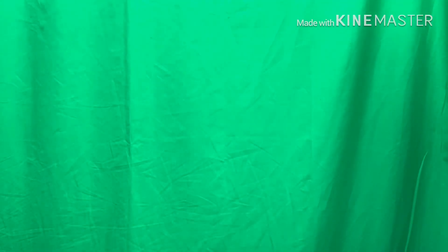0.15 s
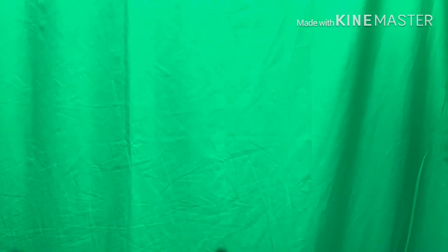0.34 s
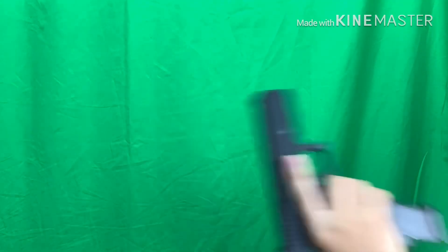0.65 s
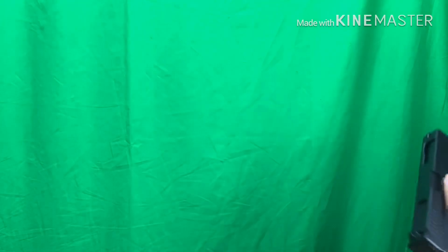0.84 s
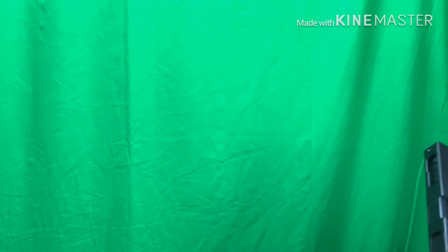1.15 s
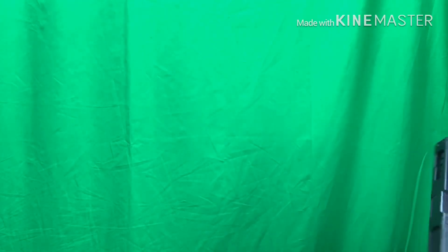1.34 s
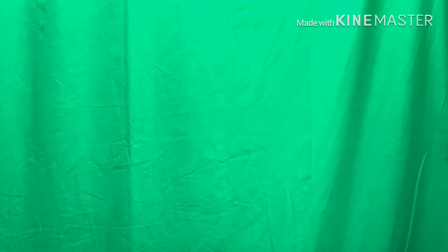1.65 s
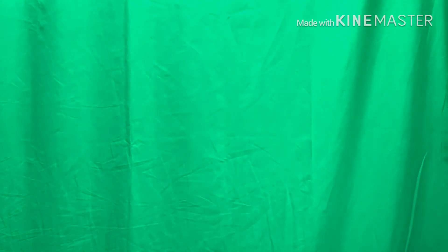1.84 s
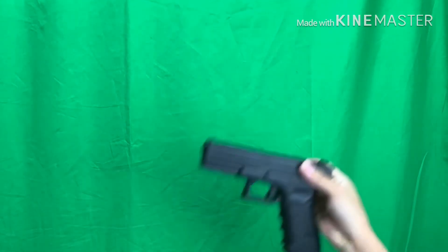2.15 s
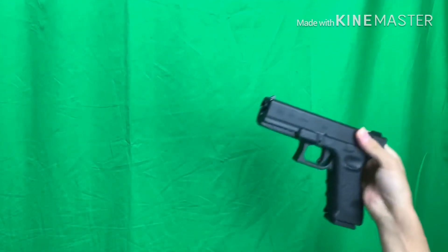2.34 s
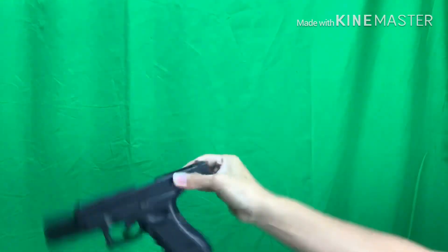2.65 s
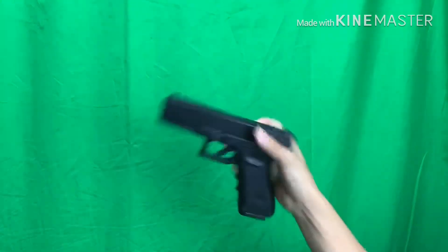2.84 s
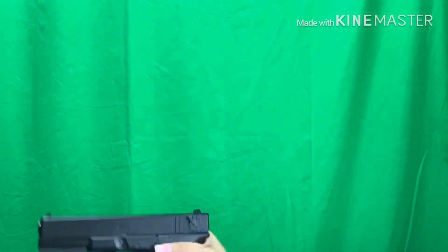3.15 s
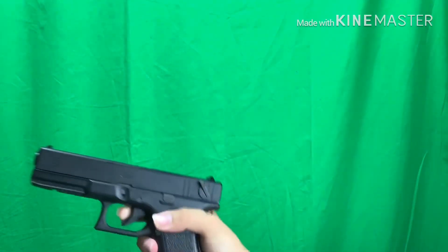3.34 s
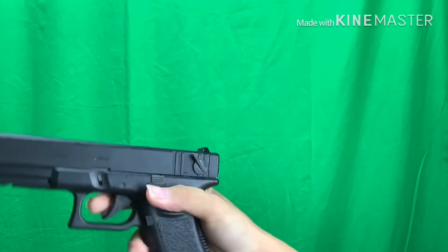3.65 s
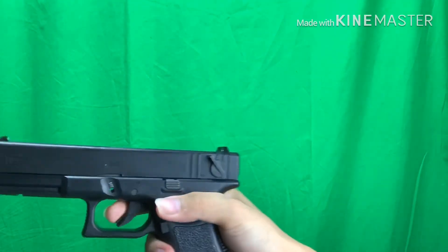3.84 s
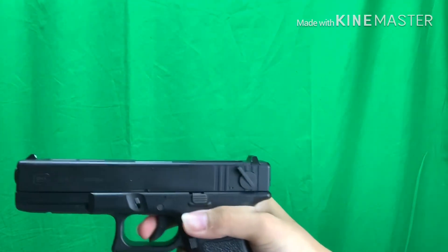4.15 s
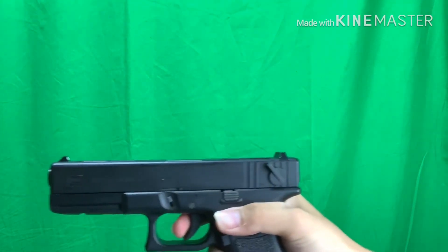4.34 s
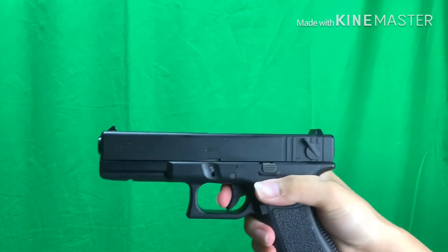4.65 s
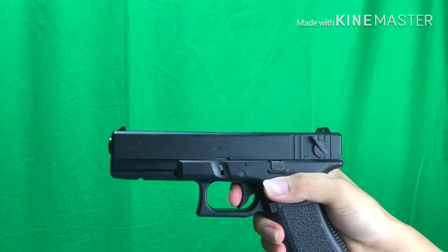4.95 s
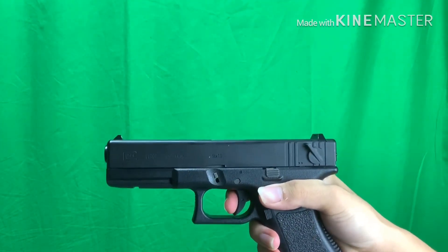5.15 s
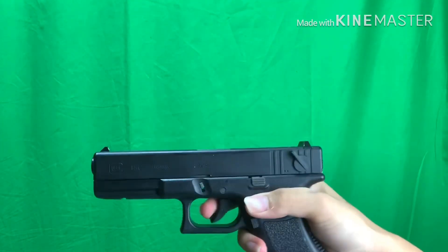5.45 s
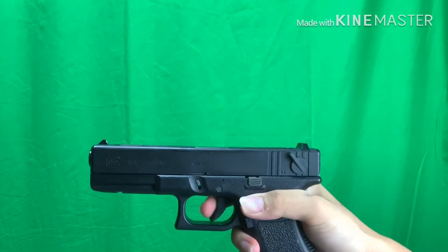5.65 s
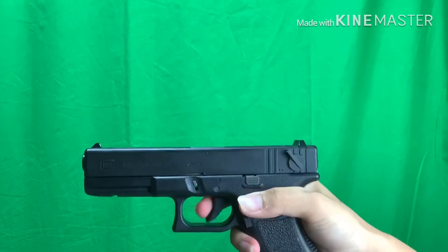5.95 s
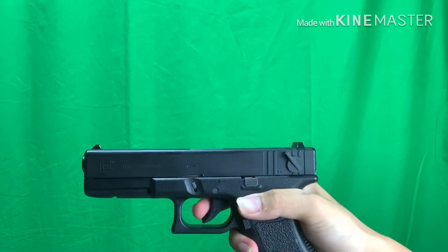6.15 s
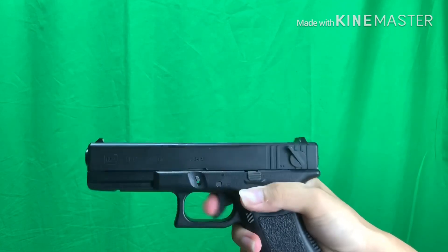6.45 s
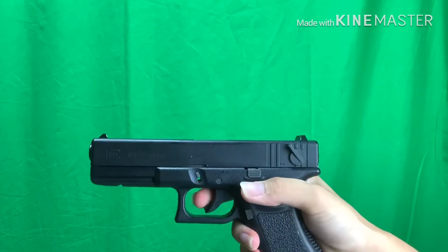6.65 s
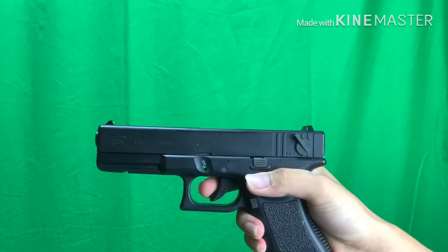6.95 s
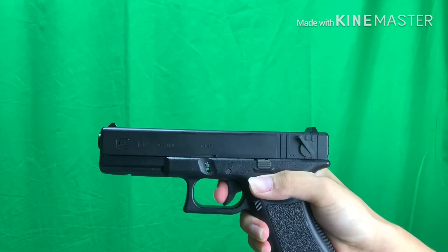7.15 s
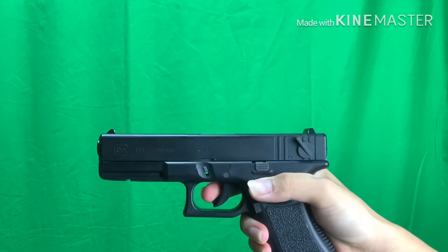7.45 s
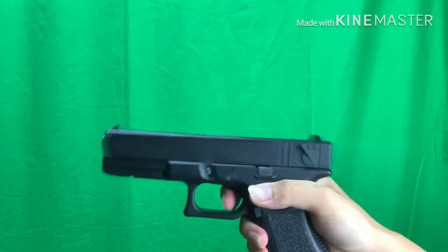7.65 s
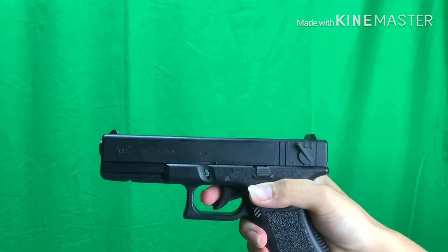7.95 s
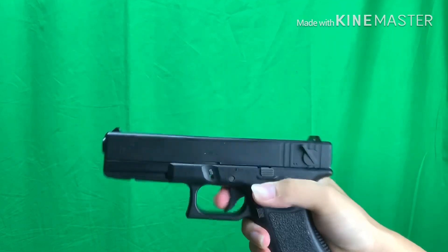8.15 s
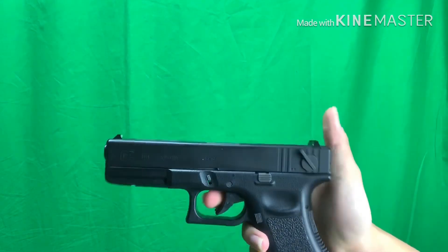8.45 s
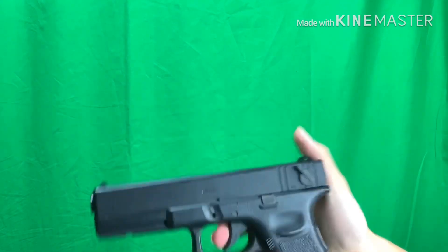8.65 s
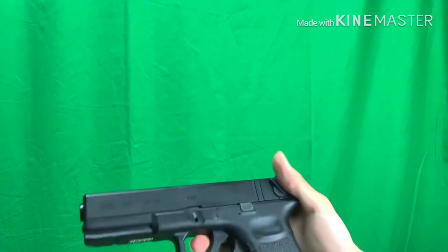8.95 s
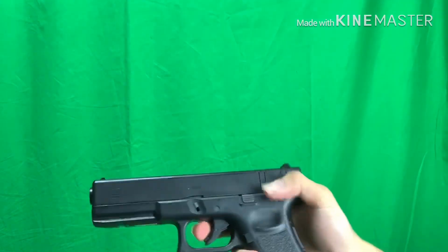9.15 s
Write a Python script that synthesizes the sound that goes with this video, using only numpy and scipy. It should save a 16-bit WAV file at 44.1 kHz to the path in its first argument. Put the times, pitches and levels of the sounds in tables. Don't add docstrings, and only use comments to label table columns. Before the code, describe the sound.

Hand rustle and light taps lead to a sharp metallic magazine click. The slide is pulled back and snapped forward, clattering harshly with short room reverberation. Quiet skin rubs and tiny squeaks follow. Then six loud, dry airy cracks come irregularly, with gas bursts, rattling plastic and steel, low air thumps on the microphone, and small trigger clicks between. It settles into faint handling over low room tone.

```python
import sys
import numpy as np
from scipy import signal
from scipy.fft import rfft, irfft, next_fast_len
from scipy.io import wavfile
from scipy.ndimage import uniform_filter1d, map_coordinates

SR = 44100
rng = np.random.default_rng(int(sys.argv[2]) if len(sys.argv) > 2 else 0)


def dump(signal):
    limited = np.clip(np.atleast_2d(signal).T, -1, 1)
    pcm = np.round(limited * 32767).astype(np.int16)
    wavfile.write(sys.argv[1], SR, pcm)


def magnitude_from_level(level_db):
    exponent = np.asarray(level_db, float) / 20
    return 10 ** exponent


N = 409688
T = np.arange(N) / SR


def unit(x):
    return x / np.sqrt(np.mean(x ** 2) + 1e-20)


def along(points, hz):
    f, v = np.transpose(points)
    return np.interp(np.log(hz + 1), np.log(f + 1), v)


def filtered(x, response):
    m = next_fast_len(x.shape[-1] + 2048)
    spectrum = rfft(x, m) * response(np.fft.rfftfreq(m, 1 / SR))
    return irfft(spectrum, m)[..., :x.shape[-1]]


def modes(table):
    def response(f):
        return sum((-1) ** k * magnitude_from_level(db) * 1j * f * width / (hz * hz - f * f + 1j * f * width)
                   for k, (hz, width, db) in enumerate(table))
    return response


def rush(response, alike, grain_db):
    def mid_side(hz):
        turn = np.arccos(np.clip(along(alike, hz), -1, 1)) / 2
        return response(hz) * [np.cos(turn), np.sin(turn)]

    mid, side = filtered(rng.standard_normal((2, N)), mid_side)
    flutter = map_coordinates(rng.standard_normal(N // 160 + 4), [np.arange(N) / 160])
    return unit(magnitude_from_level(grain_db * flutter) * np.array([mid + side, mid - side]))


def patchy(x, db):
    z = signal.stft(x, nperseg=256)[2]
    field = rng.standard_normal(z.shape[1:])
    for axis in (0, 1):
        field = uniform_filter1d(field, size=4, axis=axis)
    return unit(signal.istft(z * magnitude_from_level(db * unit(field)), nperseg=256)[1][:, :N])


def spans(rows):
    gains = np.zeros((2, N))
    for times, levels_db, low_db in rows:
        on = slice(round(times[0] * SR), round(times[-1] * SR))
        fade = np.clip(np.minimum(T[on] - times[0], times[-1] - T[on]) / 0.0058, 0, 1)
        gains[:, on] += fade * magnitude_from_level(np.interp(T[on], times, levels_db) + [[0], [low_db]])
    return gains


# (frequency [Hz], t60 [s])
ROOM_T60 = [(200, .36), (500, .3), (1400, .27), (4000, .25), (10000, .23), (12500, .21), (15500, .2)]
# (frequency [Hz], level [dB])
WALL_COLOUR = [(200, -6), (1000, -1), (4000, -0.5), (8300, 1), (15000, -5.5)]


def walls():
    buildup_s = .008
    hz, t, z = signal.stft(rng.standard_normal((2, SR // 3)), SR, nperseg=256)
    colour_db = along(WALL_COLOUR, hz) + 0.77 * rng.standard_normal(len(hz))
    decay_db = 60 * t / along(ROOM_T60, hz)[:, None]
    z = z * magnitude_from_level(colour_db[:, None] - decay_db) * (1 - np.exp(-(t / buildup_s) ** 2))
    z[1] += np.clip(1 - hz / 1000, 0, 1)[:, None] * (z[0] - z[1])
    tail = signal.istft(z, SR, nperseg=256)[1]
    return tail / np.linalg.norm(tail[0])


def room(x, tail=None):
    return signal.oaconvolve(x[None], walls() if tail is None else tail, axes=1)


# (frequency [Hz], t60 [s])
LATE_T60 = [(200, 0.31), (1000, 0.5), (4000, 0.33), (9000, 0.32), (15000, 0.24)]


def late(x):
    hz, t, z = signal.stft(rng.standard_normal((2, SR // 2)), SR, nperseg=256)
    decay = magnitude_from_level(-60 * t / along(LATE_T60, hz)[:, None])
    z = z * decay * (1 - np.exp(-t / 0.016)) * (hz[:, None] > 150)
    tail = signal.istft(z, SR, nperseg=256)[1]
    return signal.fftconvolve(x.mean(0)[None], tail / np.linalg.norm(tail[0]), axes=1)[:, :N]


# (frequency [Hz], density [dB per Hz])
HUM_SPECTRUM = [(12, -36.5), (20, -2), (86, -5), (607, -30), (802, -31.5), (1660, -37.5), (2670, -41.5),
                (14300, -47), (16000, -57.5)]
# (time [s], level [dB])
HUM_LEVEL = [(0, -76), (2.6, -76), (3.1, -72), (3.5, -76.5), (5.303, -76.5), (6.1, -76.5), (7.2, -82),
             (7.6, -68), (8.299, -81.5), (8.6, -88.5), (9.29, -92.5)]
# (frequency [Hz], left-right likeness [-1 to 1])
HUM_COHERENCE = [(60, 1), (380, 0.62), (2380, 0.81), (15000, -0.04)]


def room_tone():
    s, db = np.transpose(HUM_LEVEL)
    return magnitude_from_level(np.interp(T, s, db) + 10.5) * rush(lambda f: magnitude_from_level(along(HUM_SPECTRUM, f)), HUM_COHERENCE, -2.0)


# (loudest [s], rustle [dB], swells [s], fades [s], low part [dB])
RUBS = [(0.547, -51.5, 0.092, 0.068, -11), (0.871, -43.5, 0.067, 0.043, -3.5),
        (.915, -45, .012, 0.16, -9.5), (1.504, -72.5, 0.11, 0.27, -19.5), (1.775, -60.5, 0.12, 0.18, -4),
        (1.92, -71, .04, 0.16, -14), (2.04, -66, 0.27, 0.14, -35), (2.105, -65.5, 0.08, 0.1, 10.5),
        (2.374, -74, 0.038, 0.091, 2), (2.624, -54.5, 0.013, 0.11, 12), (4.26, -77.5, 0.6, 0.23, -25),
        (4.47, -72, 0.19, 0.19, -22), (4.542, -59, 0.069, 0.1, -7), (5.68, -59, 0.069, 0.083, 8),
        (5.818, -66.5, .012, .09, 14.5), (6.2, -59.5, 0.064, 0.14, 7.5), (6.746, -49, 0.043, 0.11, -1.5),
        (6.958, -72, 0.017, 0.15, 10.5), (8.051, -59, 0.037, 0.087, -1.5),
        (9.274, -67.5, 0.057, 0.033, -5.5)]
# (frequency [Hz], density [dB per Hz])
CLOTH_SPECTRUM = [(900, -26), (2000, -16), (4500, -11.5), (7600, -8), (8300, 0), (10500, -8.5),
                  (14800, -15.5), (16000, -27.5)]
# (frequency [Hz], width [Hz], level [dB])
PALM_MODES = [(450, 400, -8), (1000, 430, -4), (1500, 320, 1.5), (2400, 660, -5.5), (3600, 590, -2.5)]
# (frequency [Hz], left-right likeness [-1 to 1])
NEAR_COHERENCE = [(200, 0.78), (640, 0.94), (1400, 0.11), (3000, 0.6), (12000, 1)]


def rustle():
    depth_db = 26
    bright, low = spans(([s - swells_s, s, s + fades_s], [db - depth_db, db, db - depth_db], low_db)
                        for s, db, swells_s, fades_s, low_db in RUBS)
    soft = bright * rush(lambda f: magnitude_from_level(along(CLOTH_SPECTRUM, f)), NEAR_COHERENCE, grain_db=2.5)
    return magnitude_from_level(-1.5) * soft + magnitude_from_level(-3) * low * rush(modes(PALM_MODES), NEAR_COHERENCE, grain_db=3)


# (time [s], level [dB], pitch [Hz], half length [ms])
SLIPS = [
    (3.908, -70, 1700, 8),
    (3.924, -70, 1680, 5),
    (5.128, -68, 1620, 9),
    (4.85, -66, 1600, 8),
]


def squeaks():
    out, t = np.zeros(N), np.arange(-SR // 20, SR // 20) / SR
    for s, db, hz, ms in SLIPS:
        bell = np.exp(-(t / (ms / 1000)) ** 2)
        note = np.sin(2 * np.pi * hz * t + 2 * np.sin(500 * t))
        out[round((s + t[0]) * SR):][:len(t)] += magnitude_from_level(db) * bell * note
    return out + magnitude_from_level(-2.0) * room(out)[:, :N]


# (time [s], signed peak [1], swing [Hz])
AIR_SURGES = [(2.87, .012, 14), (5.411, .24, 90), (5.431, -.17, 60), (5.443, .12, 30), (6.481, .17, 66),
              (6.516, -.07, 32), (7.3695, .36, 38), (7.745, -.1, 80), (7.76, .36, 30), (7.7592, -.2, 110),
              (8.21, -.12, 70), (8.226, .4, 31), (8.2245, -.22, 110)]
# (time [s], peak [dB], t60 [s], stilled at [s])
STAND_SHIVERS = [(2.85, -40, .4, 3.3), (5.46, -33, .3, 5.6), (5.593, -31, .9, 5.93), (6.54, -33, .2, 6.62),
                 (6.585, -38, 1.4, 6.82), (7.39, -40, .7, 7.6), (7.56, -44, .6, 7.75),
                 (7.79, -37, .4, 7.88), (7.85, -39, 1.4, 7.99), (7.945, -46, .3, 8.05),
                 (8.25, -36, .25, 8.37), (8.352, -42, .7, 8.68)]


def pushes():
    bell_cycles, stand_hz, jolt_s = 0.3, 43.7, 0.0011
    out, t, life = np.zeros(N + SR), np.arange(-SR // 10, SR // 10) / SR, np.arange(SR // 2) / SR
    for s, peak, hz in AIR_SURGES:
        bell = np.exp(-.5 * (hz * t / bell_cycles) ** 2)
        out[round((s + t[0]) * SR):][:len(t)] += peak * np.cos(2 * np.pi * hz * t) * bell
    for s, db, t60, end in STAND_SHIVERS:
        out[round((s + t[0]) * SR):][:len(t)] -= magnitude_from_level(db) * np.exp(-.5 * (t / jolt_s) ** 2)
        ring = magnitude_from_level(db - 60 * life / t60) * np.sin(2 * np.pi * stand_hz * life)
        out[round(s * SR):][:len(life)] += ring * np.clip((end - s - life) / .09, 0, 1)
    b, a = signal.butter(2, 3, "high", fs=SR)
    out = signal.lfilter(b, a, out[:N])
    return np.array([np.roll(out, 12), out])


# (end [s], level [dB], length [ms])
SHOT_SWELLS = [
    (5.401, -12, 27.7),
    (5.905, -35.5, 26),
    (5.915, -15, 15),
    (6.47, -20, 27.2),
    (7.35, -15.5, 27),
    (7.736, -13.5, 23),
    (8.201, -13, 22.4),
]


def swells():
    rise = np.zeros(N)
    for s, db, ms in SHOT_SWELLS:
        on = slice(round((s - ms / 1000) * SR), round(s * SR))
        rise[on] = magnitude_from_level(db - 32 * (s - T[on]) / (ms / 1000))
    bands_db = np.minimum(9 * rng.standard_normal(40), 2)

    def response(f):
        edges = np.clip((f - 100) / 200, 0, 1) * np.clip((8800 - f) / 400, 0, 1)
        return edges * (1 + 600 / (f + 100)) * magnitude_from_level(bands_db[np.minimum(f // 330, 39).astype(int)])

    return rise * rush(response, NEAR_COHERENCE, grain_db=.7)


# (loudest [s], hiss [dB], lasts [s], fades by [dB], low part [dB])
GAS_STROKES = [(2.722, -19.5, 0.11, -2, -25.5), (2.931, -14, 0.019, 0, -25.5),
               (5.408, -18.5, .095, 0.5, -4), (5.928, -20.5, 0.027, -4.5, -4.5),
               (5.95, -13, 0.021, 0, -1.5), (5.982, -18, 0.05, 9.5, -2), (6.478, -19.5, 0.017, -9.5, 0.5),
               (6.501, -14.5, 0.061, 9.5, -3.5), (7.366, -17, .014, 1, -7),
               (7.382, -13.5, 0.053, 11.5, -4.5), (7.748, -15, 0.025, 0.5, -5),
               (7.778, -19, 0.043, 11.5, -3.5), (8.21, -16.5, 0.038, 0, -9), (8.251, -22.5, 0.023, 8, -15)]
# (frequency [Hz], density [dB per Hz])
JET_SPECTRUM = [(880, -34), (1500, -10), (5070, -10.5), (7690, -12), (8490, -9.5), (11200, -12.5),
                (12400, -13.5), (14900, -14.5), (16000, -29)]
# (frequency [Hz], width [Hz], level [dB])
GRIP_MODES = [(240, 57, -2.5), (427, 110, 6.5), (720, 460, -2.5)]
# (frequency [Hz], width [Hz], level [dB])
SLIDE_MODES = [(1500, 90, 0.5), (2070, 2000, -11.5), (2480, 330, -0.5), (3600, 1500, -4.5)]


def strokes():
    rise_s, rise_db = 0.0064, 22.5
    bright, low = spans(([s - rise_s, s, s + lasts], [db - rise_db, db, db - fades_db], low_db)
                        for s, db, lasts, fades_db, low_db in GAS_STROKES)
    jet = rush(lambda f: magnitude_from_level(along(JET_SPECTRUM, f)), NEAR_COHERENCE, grain_db=3)
    hiss = magnitude_from_level(-6) * bright * patchy(jet, 4)
    shaken = rush(modes(GRIP_MODES + SLIDE_MODES[:2]), NEAR_COHERENCE, grain_db=5.5)
    dry = hiss + magnitude_from_level(-9.0) * low * shaken
    return dry + magnitude_from_level(-1.5) * room(dry.mean(0))[:, :N]


# (time [s], level [dB], [(frequency [Hz], width [Hz], level [dB])])
MAGAZINE_NOTES = [
    (0.898, -19.5, [(942, 96, -9.5), (2470, 50, -9), (3620, 44, -2.5), (4180, 39, 5), (6020, 80, -7.5), (7960, 41, -1.5), (8460, 120, -6), (9640, 27, -6.5)]),
    (1.055, -15.5, [(1470, 160, -9.5), (2450, 23, -9), (3830, 30, -9), (4500, 52, -8.5), (5540, 53, 2), (8340, 74, -3.5), (8900, 150, 0), (12100, 67, -1), (13900, 43, -15.5), (15000, 64, -10), (15200, 69, -14)]),
]


def magazine():
    damping = 4
    out = np.zeros((2, N + SR))
    for s, db, notes in MAGAZINE_NOTES:
        impulse = 1. * (np.arange(SR // 20) == 0)
        ring = filtered(impulse, modes([(hz, damping * width, g) for hz, width, g in notes]))
        wet = room(magnitude_from_level(db) * 4 * ring / np.linalg.norm(ring))
        out[:, round(s * SR):round(s * SR) + wet.shape[1]] += wet
    return out[:, :N]


# (hammer [s], hammer [dB], hammer pitch [Hz], falling note [dB], pop [dB])
VALVE_SHOTS = [
    (5.396, -3, 3070, -16.5, -18),
    (5.418, -12, 3000, -13, -41),
    (5.9128, -2.5, 4124, -36.5, -10.5),
    (6.4669, -4, 4295, -17, -14.5),
    (7.346, -3.5, 4500, -14, -13),
    (7.7305, -11.5, 4780, -13, -13),
    (8.199, -6.5, 3830, -10.5, -14),
]
CHAMBER_OPENS = [5.3982, 5.419, 5.9135, 6.4678, 7.3473, 7.7336, 8.199]
NOZZLE_POPS = [5.4113, 5.4319, 5.9262, 6.4807, 7.3597, 7.7468, 8.2121]
# (time [s], level [dB])
SLIDE_STOPS = [
    (5.452, -21),
    (5.969, -25),
    (6.523, -14),
    (7.4015, -16),
    (7.789, -17),
    (8.2555, -24),
    (8.26, -21),
]


def chamber():
    def note(hz):
        return np.sin(2 * np.pi * np.cumsum(hz) / SR)

    out, t = np.zeros(N), np.arange(SR // 20) / SR
    fall = note(110 + 2800 * np.exp(-t / .0017))
    fall = fall * (t / .0033) ** 2.2 * np.exp(2.2 - 2.2 * t / .0033)
    pop = -note(1500 - 1150 * np.exp(-t / .003))
    pop = pop * (np.exp(-(t / .002) ** 2) + .3 * np.exp(-(t / .016) ** 2))
    for fall_s, pop_s, (*_, fall_db, pop_db) in zip(CHAMBER_OPENS, NOZZLE_POPS, VALVE_SHOTS):
        out[round(fall_s * SR):][:len(t)] += magnitude_from_level(fall_db) * fall
        out[round(pop_s * SR):][:len(t)] += magnitude_from_level(pop_db) * pop
    stop = note(1730 + 543 * np.exp(-t / .004)) * np.exp(-t / 0.002) * (1 - np.exp(-t / 0.00083))
    for s, db in SLIDE_STOPS:
        out[round(s * SR):][:len(t)] += magnitude_from_level(db) * stop
    hollow = filtered(out, modes([(400, 58, 1), (1480, 54, -8.5)]))
    return np.array([np.roll(out, 6), out]) + room(magnitude_from_level(-10.5) * out + magnitude_from_level(-5.0) * hollow)[:, :N]


# (time [s], peak [dB], pitch [Hz])
SLIDE_BLOWBACK = [(5.442, -6, 5030), (5.45, -6, 2522), (5.9346, -6.5, 1450), (5.953, -11.5, 3670),
                  (5.962, -8, 5200), (5.985, -9, 1980), (6.488, -18, 3800), (6.505, -8, 1730),
                  (6.515, -7, 4750), (6.5232, -13, 1445), (7.3671, -8.5, 5200), (7.382, -13.5, 4970),
                  (7.4029, -4, 1960), (7.7261, -10, 1231), (7.756, -7.5, 3813), (7.789, -4.5, 1920),
                  (7.793, -11.5, 5530), (7.831, -16.5, 8500), (8.2212, -7, 1470), (8.2553, -3, 2000),
                  (8.259, -15.5, 1914)]
# (time [s], peak [dB])
SLIDE_RETURNS = [
    (5.5283, -8.5),
    (6.05, -10),
    (6.5897, -12.5),
    (7.498, -14.5),
]
# (time [s], steel [dB], plastic over steel [dB], plastic pitch [Hz])
RACKING_HITS = [(0.8901, -20.5, 3, 4640), (.891, -48, 17, 960), (0.898, -43.5, 12, 1297),
                (.912, -30.5, -3.5, 3500), (.918, -32.5, -6, 4133), (1, -48.5, 9, 3480),
                (1.0339, -26, 11.5, 8900), (1.036, -30, -12.5, 4500), (1.0552, -8.5, -11.5, 3850),
                (1.0559, -32, 15, 6490), (1.0546, -32, 15.5, 10180), (1.063, -25.5, -11.5, 5000),
                (1.069, -18, -14.5, 5480), (1.0722, -22, -13, 5490), (1.0551, -23, 14.5, 13060),
                (1.054, -50, 8, 1000), (2.6264, -37.5, -6.5, 2500), (2.699, -34, 6.5, 1722),
                (2.7061, -37.5, -6, 8000), (2.711, -29, -3, 6517), (2.716, -21, 3, 6410),
                (2.7252, -5.5, -13.5, 1000), (2.7437, -15, -11, 4195), (2.747, -7.5, -18.5, 5200),
                (2.7684, -10, -5, 3275), (2.7562, -10.5, -5.5, 1700), (2.7728, -2.5, -8, 4952),
                (2.914, -25.5, 5.5, 2207), (2.9222, -12, -7, 2086), (2.934, -21.5, -1.5, 4882),
                (2.939, -6, -1.5, 6310), (2.943, -7, -7, 2613), (2.9483, -4.5, -7, 1898),
                (3.051, -36.5, 12, 2600), (3.1014, -23.5, -1, 5230), (3.1362, -45, 12, 2400),
                (3.1724, -47.5, -9, 1570), (3.211, -54, 13.5, 1850), (3.2231, -40, -13, 1940),
                (3.3283, -69.5, 16, 1880), (3.4171, -61, 14, 4800), (3.438, -48, -2, 2018)]
# (time [s], steel [dB], plastic over steel [dB], plastic pitch [Hz])
HANDLING_TAPS = [(0.5563, -60, 14, 1840), (0.7896, -56, -19.5, 5840), (0.859, -27.5, 0, 3300),
                 (.8613, -36.5, 4, 1760), (0.864, -31, -5, 1190), (0.868, -42, 6.5, 1297),
                 (1.7665, -52, 3, 3500), (1.773, -50.5, 4, 4500), (1.896, -55, 11, 2640),
                 (2.052, -48, -10, 5000), (2.119, -54, 8, 5500), (1.891, -46, 1.5, 2130),
                 (1.899, -61, 9, 1330), (2.0722, -54, 14.5, 1800), (2.094, -42, -2, 2070),
                 (2.109, -62, 6.5, 1450), (2.161, -70, 13, 1480), (3.682, -75, 11, 1420),
                 (4.534, -50, -5, 1180), (4.584, -57, 7.5, 4520), (8.6914, -49, 4, 1320),
                 (8.7844, -78.5, 21, 1904), (8.844, -78.5, 19, 1924), (8.873, -55, -3, 3780),
                 (8.9136, -72.5, 23, 1570), (9.073, -70, 15.5, 1227), (9.107, -77, 18.5, 1830),
                 (9.179, -71.5, 9, 1990), (9.225, -74.5, 17.5, 1950), (9.269, -64, 18, 12800),
                 (9.268, -40, -13, 2100)]
# (time [s], steel [dB], plastic over steel [dB], plastic pitch [Hz])
TRIGGER_CLICKS = [(5.8083, -54.5, -1.5, 1500), (5.826, -52, 5, 4030), (6.1931, -38, 1, 3770),
                  (6.3509, -44.5, -6.5, 1706), (6.735, -34.5, -5, 3600), (7.283, -48, -8, 1625),
                  (7.6967, -41, -6.5, 4240), (8.043, -45, -3, 3090), (8.1686, -40, -8.5, 1830)]
# (time [s], steel [dB], plastic over steel [dB], plastic pitch [Hz])
CLOSE_SNAPS = [(0.5525, -56, 13, 4400), (.5525, -56, 15, 2900), (0.5528, -56, 19, 1100),
               (0.8988, -19, 7, 3700), (2.6275, -38, 8, 4600), (2.6245, -50, 14, 1300),
               (2.887, -50, 16, 1400), (4.8426, -70, 18, 1600), (4.843, -76, 14, 3500)]


def contacts():
    # (plastic over steel [dB], grip knock over plastic [dB], room [dB])
    hammer, slide_back, slide_home = (-6, -11.5, -6), (-7, -18, -10), (-16.5, -12.5, -7.5)
    return_hz = 1420
    hits = [(s, db, hz, *hammer) for s, db, hz, *_ in VALVE_SHOTS]
    hits += [(*row, *slide_back) for row in SLIDE_BLOWBACK]
    hits += [(*row, return_hz, *slide_home) for row in SLIDE_RETURNS]
    for table, knock_db, room_db in ((RACKING_HITS, -35, -8.5), (HANDLING_TAPS, -20, -4),
                                     (TRIGGER_CLICKS, -20, -4), (CLOSE_SNAPS, -35, -11)):
        hits += [(s, db, hz, plastic_db, knock_db, room_db) for s, db, plastic_db, hz in table]
    return [(s, db, plastic_db + knock_db, plastic_db, hz, room_db)
            for s, db, hz, plastic_db, knock_db, room_db in hits]


# (frequency [Hz], width [Hz], level [dB])
STEEL_MODES = [(5200, 10000, 5), (7260, 5100, 3), (8170, 440, 5), (10270, 600, 7), (12200, 630, 1),
               (16200, 2900, -2.5)]
BLOW_RISE = [0.0027, 0.0017, 0.0014]


def clacks():
    scatter_db, edge = 2.5, 2.5
    out, t = np.zeros((2, N + SR)), np.arange(SR // 40) / SR
    impulse = 1. * (t == 0)
    u = t / np.reshape(BLOW_RISE, (-1, 1, 1))
    port_share = np.array([[.9], [.7], [.55]])
    grip = modes(GRIP_MODES)
    tails = [walls() for _ in range(23)]
    for n, (s, db, knock_db, plastic_db, hz, room_db) in enumerate(contacts()):
        def slide(width):
            ring = modes([(hz, width * hz, 0)] + [(c, w, g - 12) for c, w, g in SLIDE_MODES])
            return lambda f: ring(f) / (1 + 1j * f / (1.7 * hz)) ** 2

        scatter = scatter_db * rng.standard_normal(len(STEEL_MODES))
        bits = modes([(c, w, g + r) for (c, w, g), r in zip(STEEL_MODES, scatter)])

        def steel(f):
            return bits(f) * (1j * f / (1j * f + 3500)) ** 2

        burst = rng.standard_normal((3, 2, len(t)))
        burst[:, 1] += port_share * (burst[:, 0] - burst[:, 1])
        burst *= (u * np.exp(1 - u)) ** 2
        burst[1:, :, round(.001 * SR)] += edge
        parts = np.array([filtered(b, body) for b, body in zip(burst, (grip, slide(0.1), steel))])
        gains = magnitude_from_level([db + knock_db, db + plastic_db, db + 3.5])[:, None, None]
        parts *= gains / np.abs(parts).max(2, keepdims=True)

        even = np.array([filtered(impulse, body) for body in (grip, slide(0.34), steel)])
        strength = np.linalg.norm(parts[:, 0], axis=1, keepdims=True)
        even *= strength / np.linalg.norm(even, axis=1, keepdims=True)
        wet = magnitude_from_level(room_db) * room(even.sum(0), tails[n % len(tails)])
        at = round((s - .0008) * SR)
        out[0, at + 6:][:len(t)] += parts[:, 0].sum(0)
        out[1, at:][:len(t)] += parts[:, 1].sum(0)
        out[:, at:at + wet.shape[1]] += wet
    return out[:, :N]


def scene():
    pistol = clacks() + magazine() + squeaks() + chamber() + swells() + strokes() + rustle()
    return pistol + magnitude_from_level(-22) * late(pistol) + pushes() + room_tone()


def band_limit(x):
    return signal.sosfilt(signal.butter(12, 16650, fs=SR, output="sos"), x)


# (frequency [Hz], level [dB])
PORT_BALANCE = [(500, 0), (2000, -1), (5000, -0.5), (8500, 8), (12000, 0)]
# (frequency [Hz], width [Hz], depth [0-1])
TOP_GAPS = [(11300, 520, .95), (13480, 520, .97), (16500, 2400, .95)]


def record(dry):
    def gaps(f):
        return np.prod([1 - np.clip(depth, 0, 1) * np.exp(-((f - hz) / (width / 2)) ** 4)
                        for hz, width, depth in TOP_GAPS], axis=0)

    x = filtered(dry, lambda f: magnitude_from_level(along(PORT_BALANCE, f) * [[.5], [-.5]]))
    x = x / (1 + np.abs(x / .9) ** 6) ** (1 / 6)
    gapped = filtered(x, gaps)
    power = np.diff(x.mean(0), prepend=0) ** 2
    attack = uniform_filter1d(power, size=130) / (np.abs(uniform_filter1d(power, size=2000)) + 1e-12)
    x = gapped + np.clip((attack - 2.2) / 4.1, 0, 1) * (x - gapped)
    x = filtered(x, lambda f: np.clip((16300 - f) / 400, 0, 1) ** 2)
    return band_limit(x)


dry = scene()
out = record(dry)
dump(out)
```